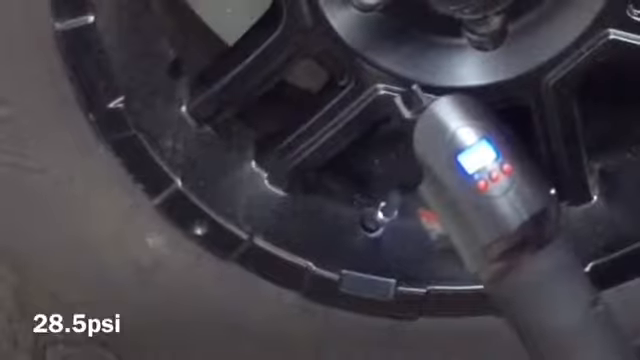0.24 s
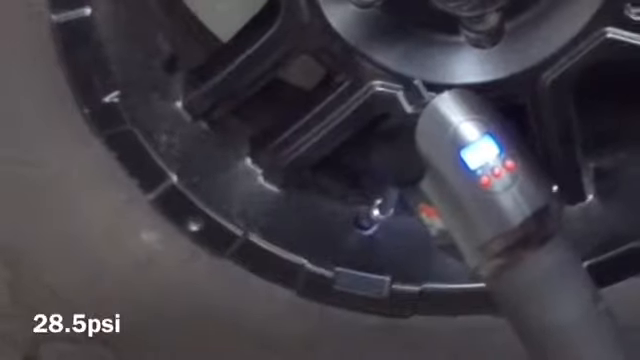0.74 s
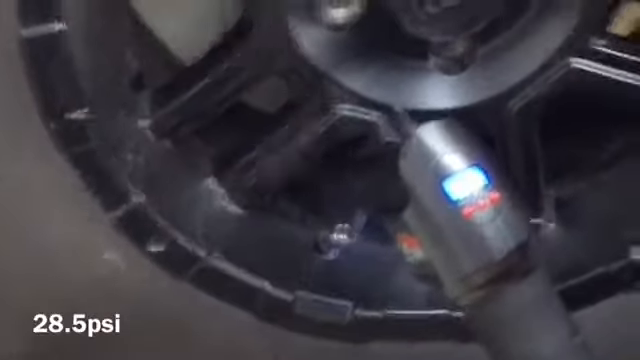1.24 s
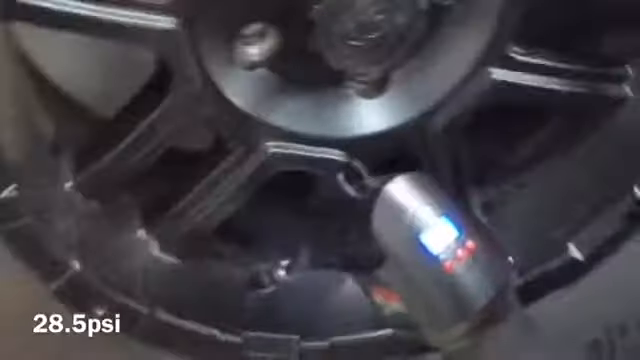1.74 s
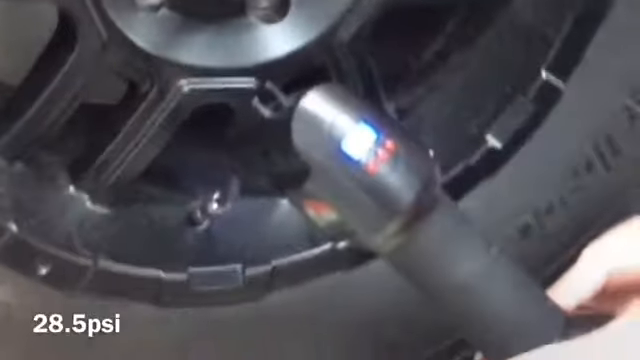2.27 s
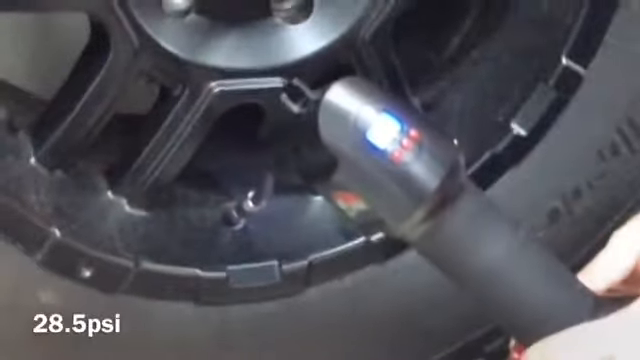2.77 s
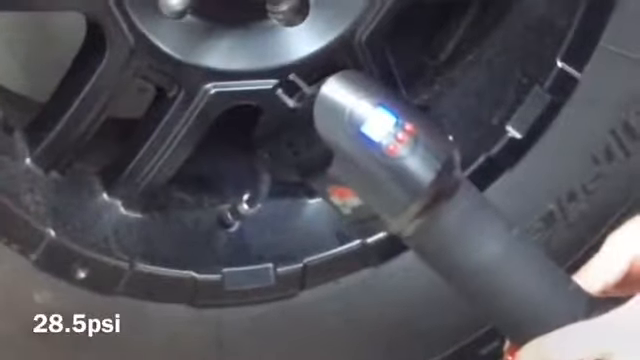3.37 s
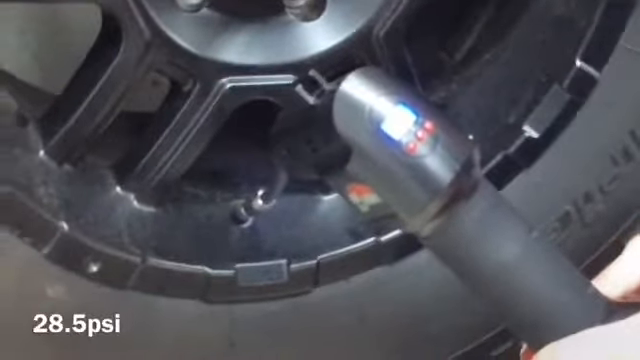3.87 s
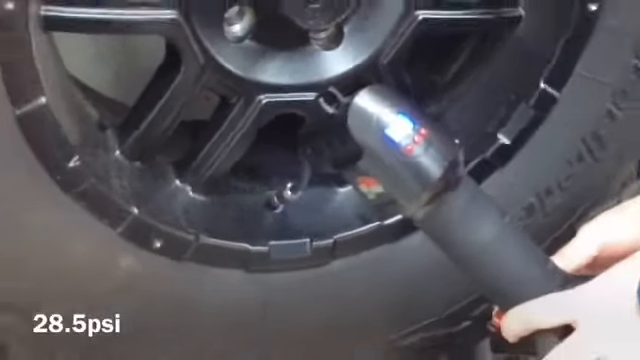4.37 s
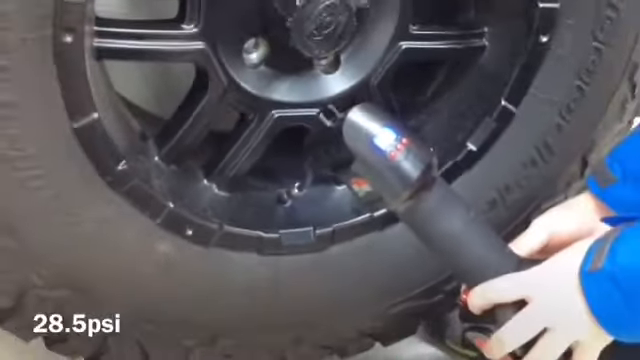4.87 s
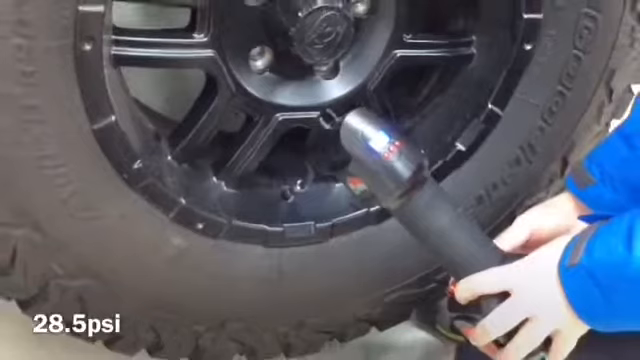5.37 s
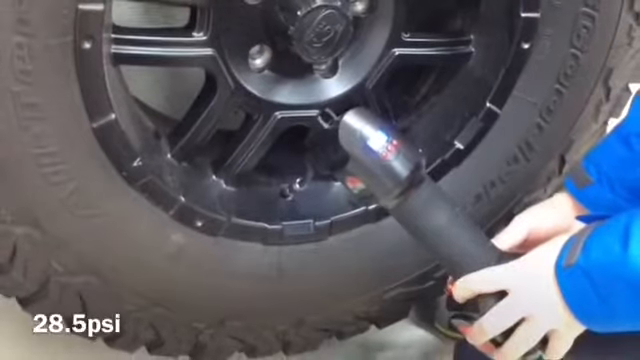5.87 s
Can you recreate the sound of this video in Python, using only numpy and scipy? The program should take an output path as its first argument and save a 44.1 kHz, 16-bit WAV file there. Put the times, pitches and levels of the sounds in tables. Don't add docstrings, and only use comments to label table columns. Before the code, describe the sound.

From 0 to about 6.1 seconds a small cordless piston compressor runs nonstop, pumping air into a car tyre. About forty-one strokes a second fuse into a low, rough buzz, almost fixed in pitch and sagging only imperceptibly. Each stroke carries hard valve knocks ringing the casing in the mids, metallic gear knocks and gritty rasp around two kilohertz and above, and tiny uneven ticks of loose parts. Air puffs pulse with the strokes, and a bright fan and leak hiss flutters over a weak piston and motor hum, with little deep bass. Until about 1.5 seconds the microphone is close; it steps back by 1.8 and again near 2.8 to 2.9, then stays farther away. The hiss and hollow wheel reflections change colour, the gear ring softens a little, and overall loudness barely changes. The very highest treble flickers faintly. The motor never starts or stops.

```python
import sys
import numpy as np
from scipy import signal
from scipy.fft import rfft, irfft
from scipy.io import wavfile
from scipy.ndimage import uniform_filter1d

SR = 44100
rng = np.random.default_rng(int(sys.argv[2]) if len(sys.argv) > 2 else 0)


def invert_db(x):
    u = np.asarray(x, float) / 20
    return 10 ** u


def wrap_up_sound(samples):
    columns = np.atleast_2d(samples).T
    tamed = np.clip(columns, -1, 1)
    steps = np.round(tamed * 32767).astype(np.int16)
    wavfile.write(sys.argv[1], SR, steps)


N = 269892
BIN_HZ = np.arange(N // 2 + 1) * SR / N

# time in seconds, speed in turns per second.
CRANK_SPEED = [(0, 41.588), (.5, 41.558), (1.2, 41.564), (1.9, 41.535), (2.35, 41.495), (2.7, 41.508),
               (3.2, 41.486), (3.8, 41.519), (4.2, 41.445), (4.85, 41.411), (5.1, 41.358), (5.6, 41.416),
               (6.12, 41.335)]
# time in seconds, place (0 near, 1 middle, 2 far).
MIC_PLACE = [
    (0, 0.072),
    (1.45, 0.21),
    (1.8, 1.24),
    (2.7, 1.39),
    (2.92, 2),
    (6.12, 1.93),
]
# place (0 to 2), knock level in dB, gear level in dB, air level in dB.
REACH = [
    (0, 1.7, 4, 5.5),
    (1.5, 1.5, 2.5, 6),
    (2, 1.93, 1, 6),
]

VALVE_KNOCKS = [
    (-0.281, -0.012, -0.013),
    (-0.2117, 0.033, 0.03),
    (-0.1231, 0.01, 0.019),
    (-0.0496, 0.051, 0.044),
    (0.032, 0.017, 0.015),
    (0.099, 0.016, 0.008),
    (0.2762, 0.011, 0.012),
]
# frequency in Hz, signed size, time to fall 60 dB in seconds.
CASING_MODES = [(611, -0.33, 0.09), (720, -0.95, 0.09), (778, -0.3, 0.04), (982, 1.0, 0.031),
                (1098, 1.0, 0.016), (1370, 0.92, 0.017), (1527, -0.43, 0.024), (1798, 0.93, 0.012)]
TOOTH_KNOCKS = [
    (0.3043, 0.012, 0.015),
    (0.3463, -0.013, -0.008),
    (0.4442, -0.02, -0.044),
    (0.5246, -0.011, 0.003),
    (0.6707, -0.004, -0.012),
    (0.8075, -0.014, -0.013),
    (0.9611, -0.004, -0.002),
]
# frequency in Hz, signed size, time to fall 60 dB in seconds.
GEAR_MODES = [(2001, -1.0, 0.035), (2118, 0.98, 0.089), (2199, 1.0, 0.023), (2395, 0.67, 0.019),
              (2535, -0.09, 0.088)]
# frequency in Hz, level in dB per Hz.
WEAR_COLOUR = [(1700, -30), (1880, -10), (2000, -20), (2400, -14), (2620, 0), (2760, -14), (4000, -6),
               (4550, -3), (6000, -6), (9000, -20)]
# frequency in Hz, width in Hz, level near in dB, level far in dB, share on the return stroke.
RASP_BANDS = [(2140, 110, 0, -14, .1), (2560, 84, -7, 2, 1.85), (3940, 220, -26, -17.5, 7.9),
              (4530, 220, -8, -8, 0.18), (6800, 280, -24, -4, .2)]
ROD_TICKS = [
    (-.2, 0.018, 0.011),
    (-.1, 0.037, 0.015),
]
# frequency in Hz, signed size, time to fall 60 dB in seconds.
SHELL_MODES = [(2990, 0.86, 0.015), (3240, 0.92, 0.023), (3820, 0.38, 0.017)]
REED_TICKS = [
    (.29, 0.024, 0.0036),
    (.4, 0.029, 0.016),
]
# frequency in Hz, signed size, time to fall 60 dB in seconds.
PLATE_MODES = [(4540, 1, 0.02), (4850, 0.54, 0.031), (5350, 0.26, 0.018), (5780, 0.29, 0.016),
               (6860, 0.43, 0.015)]

# frequency in Hz, level in dB per Hz.
PUFF_COLOUR = [(30, -38), (170, -27), (330, -20), (420, -14), (540, -21), (680, -7), (850, -11), (1080, -4),
               (1250, -8), (1650, -10), (2100, -12), (2550, -12), (2750, -19), (4000, -24)]
# frequency in Hz, level in dB per Hz.
HISS_NEAR = [(1680, -33.5), (2850, -6), (2970, 0.5), (3570, 0.5), (3920, -10), (4450, 2), (4670, 0.5),
             (5090, -2.5), (5890, -1.5), (7490, -8), (9200, -2), (10800, -7.5), (14000, -6)]
# frequency in Hz, level in dB per Hz.
HISS_MIDDLE = [(1680, -27), (2850, 1), (3570, -2.5), (3870, 4.5), (4190, -11), (4670, 7.5), (5050, -7.5),
               (6050, 6), (6380, -3), (7950, -1.5), (8840, 1), (11000, -4.5), (14000, -0.5)]
# frequency in Hz, level in dB per Hz.
HISS_FAR = [(1680, -19.5), (2850, 3), (3280, -1), (3600, 4), (3950, 2.5), (4200, -3.5), (5220, -2.5),
            (5600, 4.5), (6340, -2.5), (6800, -3.5), (8900, 1), (11500, -6.5), (14000, -3.5)]
HISS_LEVEL_DB = [
    -34.5,
    -33,
    -37.5,
]
# multiple of the crank rate, level in dB (rms).
THRUST_TONES = [(1, -77), (2, -59), (3, -61.5), (4, -56), (5, -55), (6, -53.2), (7, -48.5), (8, -50),
                (9, -63.5), (10, -57.5), (11, -41.8), (12, -55)]
# multiple of the motor rate, level in dB (rms).
HUM_TONES = [(1, -78), (2, -65), (3, -51), (4, -54), (5, -67), (6, -65), (9, -64), (10, -59)]

# frequency in Hz, width in Hz, dB near, dB far.
PLACE_BANDS = [(515, 21, 8, 4.5), (592, 20, -3, -3.5), (650, 38, -1.5, 2.5), (756, 34, -3, -2),
               (1068, 35, 3, 1.8), (1295, 47, 5, -1.5), (1566, 32, 2, 5), (1935, 49, 3.5, 5),
               (2338, 200, 0, 4.5), (2900, 68, 2.5, -5.5), (3690, 104, 1.5, -4), (4400, 94, -1, -0.5),
               (4790, 88, -1, -3), (5420, 110, 0.5, 3)]
# frequency in Hz, width in Hz, level in dB.
MIC_PORT = [(13500, 610, -3), (16000, 1100, -8)]
# low edge in Hz, high edge in Hz, share of blocks lost near, share lost far.
DROPOUT_BANDS = [(14500, 14850, .1, .5), (14850, 15150, .25, .8), (15150, 15700, .01, .15),
                 (12900, 13200, .08, .2), (10700, 11000, .06, .15)]

PINION_TEETH, CRANK_TEETH = 11, 63


def in_time(rows):
    seconds, *columns = np.transpose(rows)
    return [np.interp(np.arange(N) / SR, seconds, column) for column in columns]


def between(far, near_db, far_db):
    return invert_db(near_db + far * (far_db - near_db))


def coloured(spectrum):
    hz, level_db = np.transpose(spectrum)
    bins = np.arange(1, N // 2 + 2) * SR / N
    shape_db = np.interp(np.log(bins), np.log(hz), level_db, left=min(level_db))
    noise = irfft(rfft(rng.standard_normal(N)) * invert_db(shape_db), N)
    return noise / np.std(noise)


def once_a_turn(turn, centre, width):
    return np.exp((np.cos(2 * np.pi * (turn - centre)) - 1) / (2 * np.pi * width) ** 2)


def high_pass(x, hz):
    return signal.sosfilt(signal.butter(2, hz, "high", fs=SR, output="sos"), x)


def crank():
    start_turn, uneven_turn = .095, .002
    runout_turn, runout_start = .004, -.15
    turn = start_turn + np.cumsum(in_time(CRANK_SPEED)[0]) / SR
    uneven = uneven_turn * rng.standard_normal(int(turn[-1]) + 2)
    turn = turn + np.interp(turn, np.arange(len(uneven)), uneven)
    beat = -CRANK_TEETH / PINION_TEETH % 1
    return turn, runout_turn * np.cos(2 * np.pi * (beat * turn + runout_start))


def struck(turn, far, contacts, modes, slip_s, play_s, spread_db):
    count = int(turn[-1]) + 3
    chance = rng.standard_normal((count, 2 * len(contacts) + 1))
    lead = SR // 5
    clicks = np.zeros(N + 2 * lead)
    for k, (angle, near_push, far_push) in enumerate(contacts):
        at = np.interp(np.arange(count) - 1 + angle, turn, np.arange(N), left=-lead / 2, right=N + 9)
        share = far[np.clip(at, 0, N - 1).astype(int)]
        at = lead + at + SR * (slip_s * chance[:, -1] + play_s * chance[:, 2 * k])
        push = (near_push + share * (far_push - near_push)) * invert_db(spread_db * chance[:, 2 * k + 1])
        np.add.at(clicks, at.astype(int), push * (1 - at % 1))
        np.add.at(clicks, at.astype(int) + 1, push * (at % 1))
    ringing = 0
    for hz, size, t60 in modes:
        r = invert_db(-60 / (t60 * SR))
        w = 2 * np.pi * hz / SR
        ringing = ringing + size * signal.lfilter([0, np.sin(w)], [1, -2 * r * np.cos(w), r * r], clicks)
    return ringing[lead:lead + N]


def valve_knocks(turn, far):
    return struck(turn, far, VALVE_KNOCKS, CASING_MODES, slip_s=6e-6, play_s=8e-6, spread_db=.7)


def gear_teeth(mesh, far):
    return struck(mesh, far, TOOTH_KNOCKS, GEAR_MODES, slip_s=2e-5, play_s=1e-5, spread_db=.7)


def worn_teeth(mesh, far):
    length = round(SR / 41.5)
    one_turn = coloured(WEAR_COLOUR)[:length + 1]
    repeated = np.interp(mesh % 1 * length, np.arange(length + 1), one_turn)
    return between(far, -40, -37.5) * repeated


def grind(mesh, far):
    white = rng.standard_normal(N)
    loaded = .16 + once_a_turn(mesh, .42, .09)
    back = once_a_turn(mesh, -.2, .06)
    total = 0
    for hz, width_hz, near_db, far_db, share in RASP_BANDS:
        r = np.exp(-np.pi * width_hz / SR)
        resonance = [1, -2 * r * np.cos(2 * np.pi * hz / SR), r * r]
        rasp = signal.lfilter([1 - r * r, 0, r * r - 1], resonance, white * (loaded + share * back))
        total = total + between(far, near_db, far_db) * rasp
    return invert_db(-27) * total


def loose_ticks(turn, far):
    uneven = dict(slip_s=1e-5, play_s=8e-5, spread_db=3.2)
    rod = struck(turn, far, ROD_TICKS, SHELL_MODES, **uneven)
    reed = struck(turn, far, REED_TICKS, PLATE_MODES, **uneven)
    return rod + reed


def puff(turn, far):
    flaps = .7 + .3 * once_a_turn(turn, -.06, .1) + .4 * once_a_turn(turn, .36, .1)
    return between(far, -37.5, -40) * flaps * coloured(PUFF_COLOUR)


def hiss(turn, place):
    total = 0
    for k, spectrum in enumerate([HISS_NEAR, HISS_MIDDLE, HISS_FAR]):
        share = np.sqrt(np.clip(1 - abs(place - k), 0, 1))
        total = total + share * invert_db(HISS_LEVEL_DB[k]) * coloured(spectrum)
    gust_db = .8 * np.interp(turn, np.arange(N // 900), rng.standard_normal(N // 900))
    sag_db = 5 * once_a_turn(turn, .14, .085) + .8 * once_a_turn(turn, .68, .05)
    return total * invert_db(gust_db - sag_db)


def thrust(turn):
    angle = 2 * np.pi * (turn + .226)
    return sum(np.sqrt(2) * invert_db(db) * np.cos(round(k) * angle - .8) for k, db in THRUST_TONES)


def hum(turn):
    motor = 2 * np.pi * turn * CRANK_TEETH / PINION_TEETH
    return sum(np.sqrt(2) * invert_db(db) * np.cos(k * motor + k * k) for k, db in HUM_TONES)


def place_colour(x, far):
    spectrum = rfft(x)
    near_db, far_db = 0, 0
    for hz, width_hz, row_near_db, row_far_db in PLACE_BANDS:
        bump = np.exp(-((BIN_HZ - hz) / width_hz) ** 2)
        near_db = near_db + row_near_db * bump
        far_db = far_db + row_far_db * bump
    near = irfft(spectrum * invert_db(near_db), N)
    distant = irfft(spectrum * invert_db(far_db), N)
    return near + far * (distant - near)


def scene():
    even, lead = crank()
    turn, mesh = even + lead, even + lead / 2
    place = np.clip(in_time(MIC_PLACE)[0], 0, 2)
    far = place / 2
    places, *levels = np.transpose(REACH)
    knock_db, gear_db, air_db = (np.interp(place, places, db) for db in levels)
    knocks = invert_db(knock_db) * valve_knocks(turn, far)
    gear = invert_db(gear_db) * (gear_teeth(mesh, far) + worn_teeth(mesh, far) + grind(mesh, far))
    body = high_pass(knocks, 400) + high_pass(gear + loose_ticks(turn, far), 1400)
    air = invert_db(air_db) * (puff(turn, far) + hiss(turn, place))
    return place_colour(thrust(turn) + hum(even) + body + air, far)[None]


def microphone(x):
    colour_db = sum(db * np.exp(-((BIN_HZ - hz) / width_hz) ** 2) for hz, width_hz, db in MIC_PORT)
    return irfft(rfft(x) * invert_db(colour_db), N)


def drop_bands(x):
    block = 2048
    far = np.clip(in_time(MIC_PLACE)[0] / 2, 0, 1)[::block]
    for low_hz, high_hz, near_share, far_share in DROPOUT_BANDS:
        lost = rng.random(len(far)) < near_share + far * (far_share - near_share)
        gate = uniform_filter1d(np.repeat(lost * 1., block)[:N], 512)
        band = irfft(rfft(x) * (BIN_HZ > low_hz) * (BIN_HZ < high_hz), N)
        x = x - gate * band
    return x


def band_limit(x):
    return signal.sosfilt(signal.butter(12, 15740, fs=SR, output="sos"), x)


def record(dry):
    return band_limit(drop_bands(microphone(dry)))


dry = scene()
out = record(dry)
wrap_up_sound(out)
```